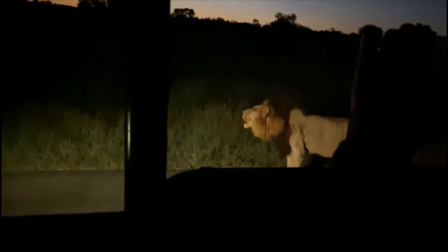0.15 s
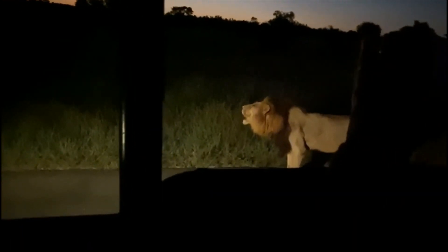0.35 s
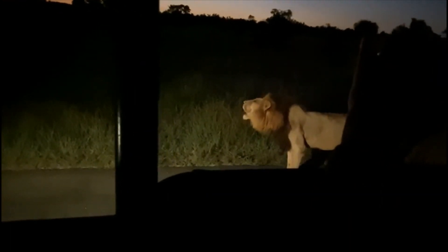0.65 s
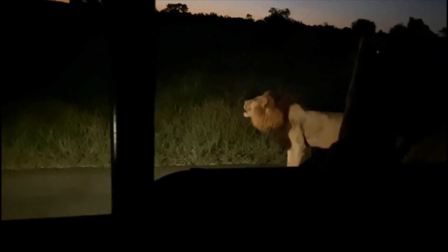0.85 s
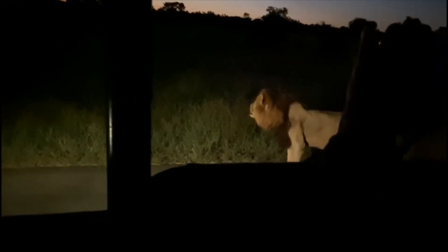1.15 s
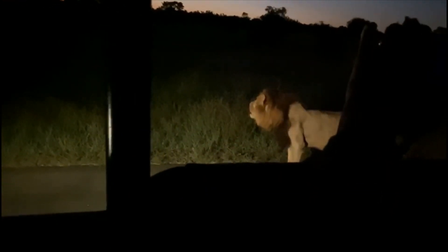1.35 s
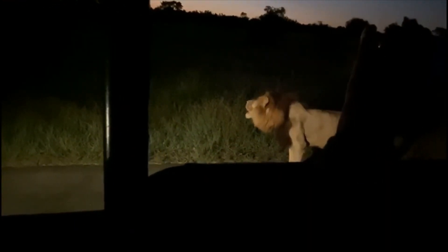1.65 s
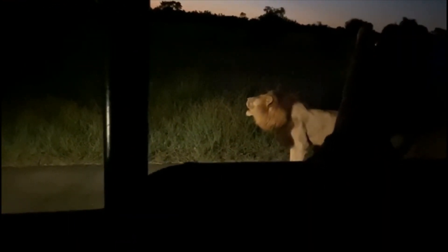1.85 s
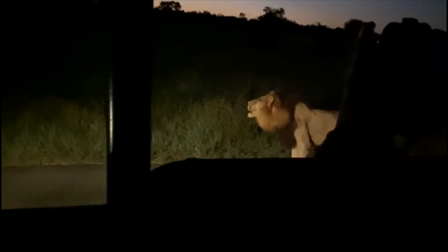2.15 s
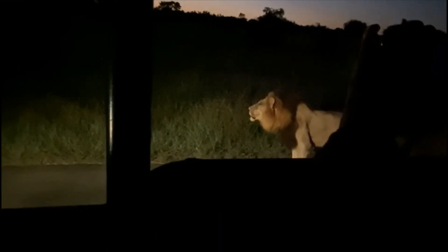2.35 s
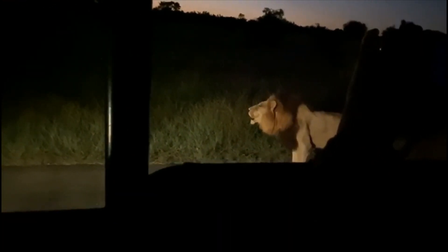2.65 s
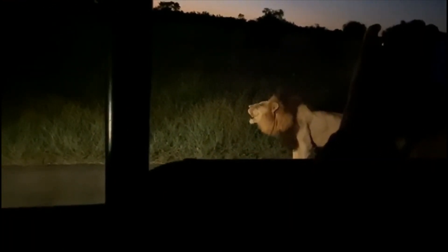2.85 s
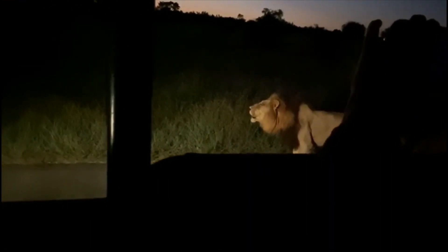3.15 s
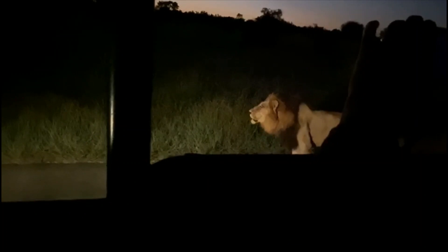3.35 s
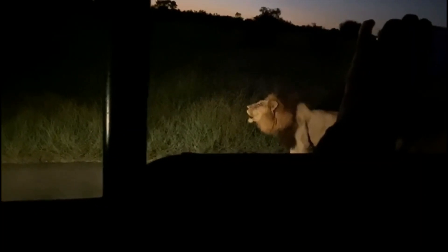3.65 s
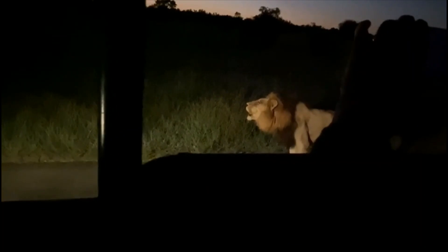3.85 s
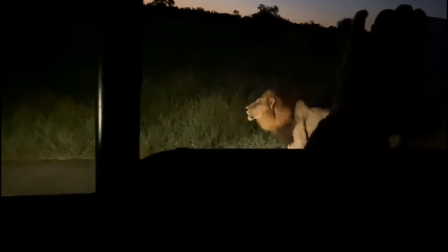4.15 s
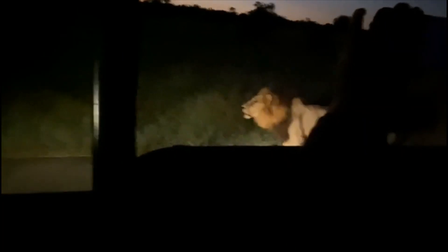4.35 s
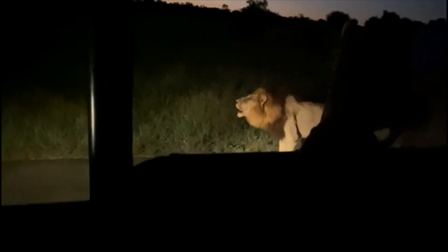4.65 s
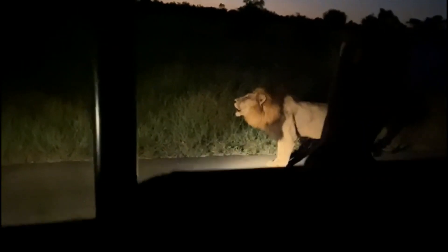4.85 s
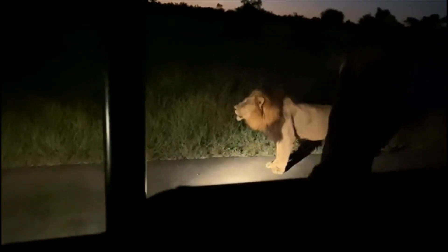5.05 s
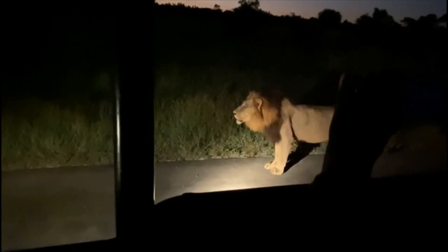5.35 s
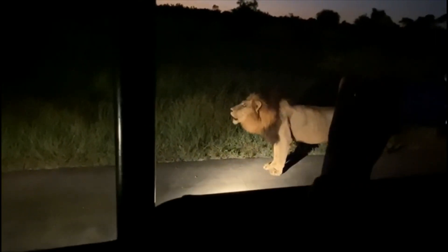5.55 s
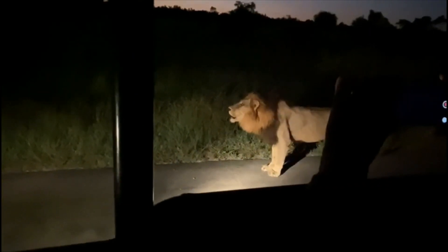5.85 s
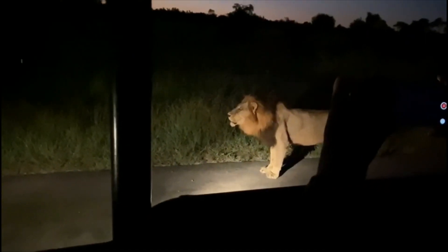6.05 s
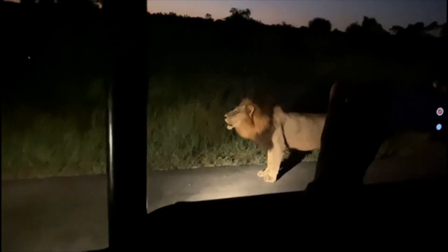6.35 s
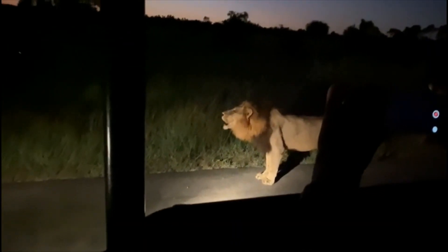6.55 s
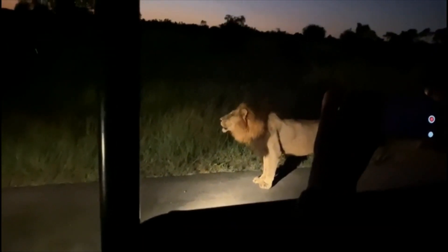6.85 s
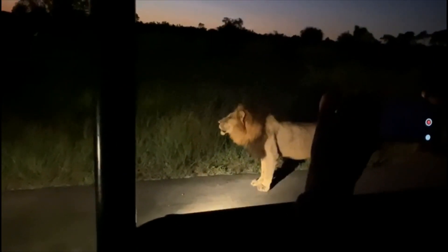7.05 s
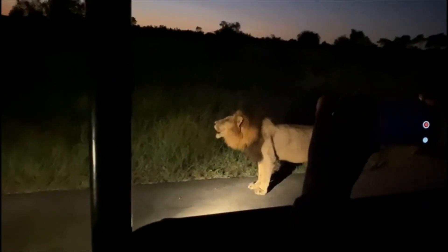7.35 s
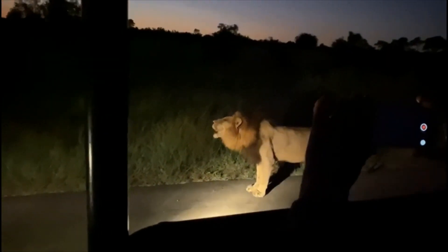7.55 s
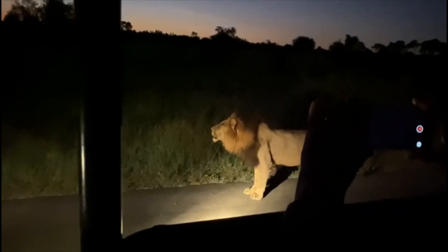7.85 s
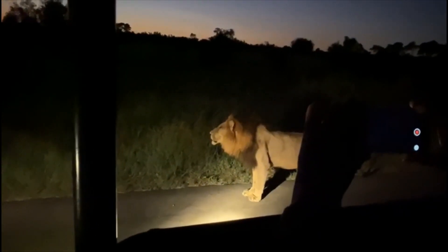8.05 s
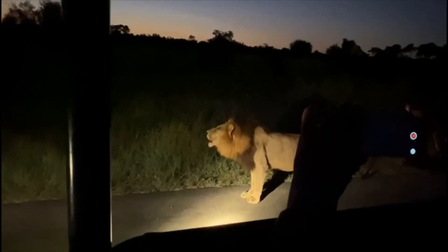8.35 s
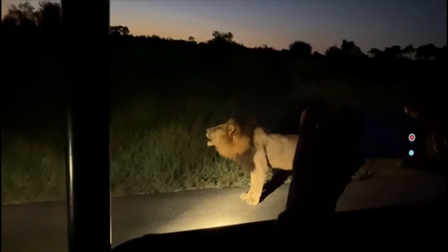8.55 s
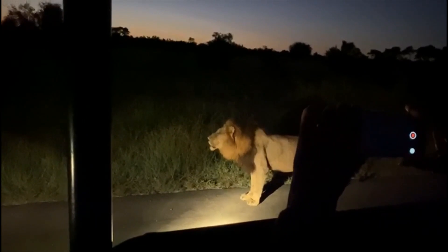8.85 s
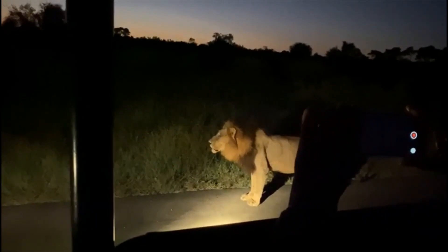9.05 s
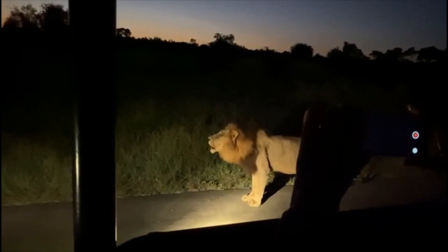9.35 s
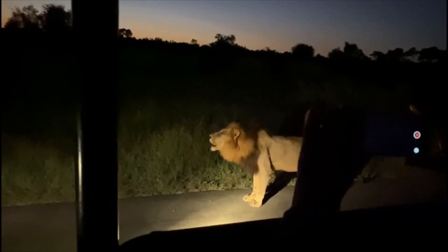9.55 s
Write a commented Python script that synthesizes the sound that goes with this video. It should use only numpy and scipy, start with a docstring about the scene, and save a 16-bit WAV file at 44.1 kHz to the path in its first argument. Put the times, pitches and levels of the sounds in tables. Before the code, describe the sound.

A lion very close by gives two deep moaning roars, then eight short hoarse grunts with rasping breaths between, over faint night crickets.

```python
"""In an open vehicle on the plain at dusk, a lion is heard a few metres away: two roars, then eight grunts.
Each call sums a near-sine chest tone, throat resonances driven by pulses and puffs, hiss and a slow growl.
A rasping breath, shaped noise, precedes each call; cloth rustles, bumps and gliding bird whistles are added.
The cabin rings low through sparse decaying echoes; crickets (chirping noise) and night air lie behind."""
import sys
import numpy as np
from scipy import signal
from scipy.fft import rfft, irfft, next_fast_len
from scipy.io import wavfile
from scipy.ndimage import uniform_filter1d, minimum_filter1d

SR = 44100
rng = np.random.default_rng(int(sys.argv[2]) if len(sys.argv) > 2 else 0)


def transcribe(u):
    """Save the signal u as a 16-bit wav file named by the first command-line argument.

    u: samples, shape (n,) or (channels, n), limited to [-1, 1]; the rate is SR.
    q: integer samples, one column per channel.
    """
    v = np.clip(np.atleast_2d(u).T, -1, 1)
    q = np.round(v * 32767).astype(np.int16)
    wavfile.write(sys.argv[1], SR, q)


N = 428211

# calls: [start t/s, fraying after t/s, break after t/s, top pitch f/Hz, pitch at break f/Hz,
#         held roughness 0-1, chest level/dB, throat level/dB, hiss level/dB, growl level/dB]
CALLS = [(.26, .44, 0.58, 171.8, 134.8, .38, -6, -17, -46.5, -23.5),
         (1.64, .25, 0.41, 151.2, 122.5, .45, -5.5, -15.5, -46.5, -24),
         (2.81, .18, 0.24, 145.9, 122.2, 0.54, -4.5, -14, -40, -25.5),
         (3.71, .15, 0.2, 146.5, 122.4, .55, -6, -15.5, -40, -27.5),
         (4.65, .18, 0.23, 141.5, 118.9, .5, -5, -14.5, -38.5, -28),
         (5.62, .14, 0.19, 138.6, 130.3, 0.66, -6.5, -13, -34, -25),
         (6.485, 0.12, 0.16, 131, 120.9, 0.7, -6, -13, -34.5, -29),
         (7.43, .15, 0.21, 137, 123.2, .6, -6, -13.5, -37.5, -24.5),
         (8.415, .14, 0.19, 133.8, 122, 0.7, -6.5, -14, -39, -25.5),
         (9.395, .15, 0.19, 132.9, 120.2, 0.7, -6.5, -15, -37, -24)]
# resonances of throat and of mouth: [f/Hz, greatest width/Hz, level/dB]
THROAT_MODES = [(217, 98, -2), (368.5, 28.8, -2), (442.8, 34, -3), (513, 27, -6.5), (600.5, 28, -2),
                (670, 28, -8.5), (764.6, 18, -6.5), (908, 20, -12), (1089, 26, -8), (1166, 45, -8.5),
                (1370, 76, -17), (1549, 80, -25)]
MOUTH_MODES = [(1970, 75, 6.5), (2360, 140, 7.5), (2860, 370, -0.5), (3670, 170, 1), (4320, 480, -3.5),
               (5160, 410, -1), (6090, 880, -6.5), (6850, 760, -5.5), (9750, 890, -9), (10630, 1300, -18.5)]
# envelope of each layer: [level at start/dB re full, opening t/s, sag up to the break/dB, slope after it/(dB/s)]
CHEST_EFFORT = (-43, 0.16, -0.5, -320)
THROAT_EFFORT = (-47, 0.12, -6.5, -230)
HISS_EFFORT = (-38, 0.177, -3.5, -190)
# pitch contour of a call
ONSET_HZ, CLIMB_FROM_S, CLIMB_S, SAG_CURVE, TAIL_S = 108.17, .04, .13, 1.6, .45
# the chest tone drops a step at the break and lingers
BREAK_DB, BREAK_S, LINGER_S = -13.5, .04, 0.079
# the growl swells while the voice frays
GROWL_UNDER_DB, GROWL_LINGER_S, GROWL_FALL_DB_PER_S = -17.5, 0.074, -240
# roughness 0-1 sets the share of noise in the throat
ROUGH_ONSET, ROUGH_FRAYED, SETTLE_S, FRAY_S = .5, .9, .16, .08

# indrawn breaths and one low after-growl: [start t/s, peak t/s, end t/s, rasp level/dB, rumble level/dB]
BREATH_EVENTS = [(0, .13, .27, -48.5, -41), (1.358, 1.54, 1.65, -48.5, -37.5), (2.58, 2.72, 2.82, -52, -44),
                 (3.081, 3.27, 3.72, -62.5, -30.5), (3.53, 3.62, 3.72, -56.5, -55),
                 (4.441, 4.57, 4.66, -53.5, -50), (5.45, 5.58, 5.64, -54.5, -56),
                 (6.319, 6.42, 6.5, -59, -57), (7.15, 7.3, 7.44, -55, -52),
                 (8.24, 8.33, 8.42, -59.5, -59.5), (9.22, 9.32, 9.4, -57.5, -57)]
# resonances of the tract on inhaling: [f/Hz, greatest width/Hz, level/dB]
INHALE_MODES = [(238, 360, -8.5), (458, 240, -2.5), (588, 140, -8.5), (763, 27, -3), (1160, 250, -8.5),
                (1390, 83, -12), (2076, 900, -25.5)]
BREATH_IN_DB, BREATH_OUT_DB = -17, -11.5  # at start and end, re the peak

# rustles of cloth: [start t/s, peak t/s, end t/s, level between 2.2 and 4 kHz/dB]
RUSTLE_EVENTS = [(0.858, .92, 1.12, -61.5), (1.001, 1.22, 1.4, -66), (1.112, 1.133, 1.19, -62),
                 (1.308, 1.342, 1.4, -58), (1.962, 2.009, 2.16, -55.5), (4.07, 4.117, 4.16, -65.5),
                 (4.14, 4.206, 4.32, -59), (5.518, 5.57, 5.62, -66.5)]
# colour of cloth: [f/Hz, spectral level/dB]
CLOTH_SPECTRUM = [(88, -30), (150, -11), (533, -16), (628, -21.5), (1130, -17), (2150, -21.5), (3870, -23),
                  (7220, -31), (8520, -42.5), (10600, -32.5), (12100, -36), (15700, -76.5), (22000, -120)]
RUSTLE_IN_DB, RUSTLE_OUT_DB = -10.5, -13.5  # at start and end, re the peak

# bumps on the vehicle: [start t/s, level before halving/dB, f/Hz, decay by 60 dB t/s]
BUMPS = [(1.017, -32, 148, 0.13), (1.14, -34, 804, 0.22), (1.219, -39.5, 711, 0.17),
         (3.437, -37.5, 166.2, 0.12), (6.118, -38, 487, 0.22), (9.079, -50, 139.7, 0.1)]
# far bird whistles: [start t/s, length t/s, first f/Hz, middle f/Hz, last f/Hz, level/dB]
BIRD_WHISTLES = [(3.27, 0.098, 3600, 3670, 3660, -76), (3.457, 0.065, 3300, 3250, 3245, -74),
                 (3.55, .09, 3230, 3300, 3250, -75), (3.66, 0.067, 2900, 3000, 2980, -71),
                 (6.98, .09, 3270, 3210, 3220, -74), (7.147, 0.084, 3080, 2800, 3130, -67),
                 (7.906, 0.18, 5370, 5780, 5420, -82), (8.039, 0.082, 2550, 2750, 3000, -79.5)]

# nearer crickets: [f/Hz, chirp rate/(1/s), chirp length t/s, level/dB re chorus before gating]
CRICKET_SINGERS = [(4670, 4.6, 0.052, 5), (5100, 1.1, 0.084, 5.5), (4440, 1.8, 0.17, -2)]
CHIRP_HZ, CHIRP_WIDTH_HZ, STROKES_PER_S = 4710, 450, 50
# the recorder's automatic gain turns the crickets down after each call, then lets them back up
CRICKET_DB, DUCK_DB, DUCK_S, RECOVER_S = -64, -6, 0.36, 0.37

# colour of the night air: [f/Hz, relative spectral level/dB]
NIGHT_SPECTRUM = [(15, -70), (25, -40), (48, -10), (101, -14.5), (134, -1), (237, -23), (349, -30),
                  (1440, -41.5), (1730, -41), (2020, -44), (4990, -45.5), (8580, -66), (12000, -56),
                  (15600, -87.5), (22000, -120)]
NIGHT_DB = -59.5

# reverberation of the cabin: [f/Hz, decay by 60 dB t/s]
CABIN_DECAY = [(60, 1), (140, 0.43), (300, 0.067), (1000, .18), (3000, 0.059), (8000, 0.034)]
# relative strength of its echoes: [f/Hz, level/dB]
ECHO_STRENGTH = [(60, -9), (140, -7), (500, -4), (1200, 0.5), (2500, 13), (6000, 2), (11000, -1.5)]
# phase by which the left port leads the right: [f/Hz, phase/rad]
PORT_LEAD = [(0, .04), (220, .05), (400, .4), (700, .3), (1030, .6), (1380, -.7), (2330, 1.5), (2840, 1.2),
             (4480, .8), (5250, 1.2), (5600, 0), (7490, 0), (8400, 3.0), (9400, 2.4), (9820, .7)]
# balance of the ports, faded in from 300 to 600 Hz: [f/Hz, left minus right level/dB]
PORT_BALANCE = [(60, 1), (140, -6), (350, 0.5), (840, -3), (2010, -2.5), (4830, 5.5), (11600, 1)]
EDGE_HZ, CEILING_DB = 12170, -4  # band limit and onset of limiting


def gain_of(db):
    """dB to gain."""
    return 10 ** (np.asarray(db) / 20)


def evened(x):
    """Scales to rms 1."""
    return x / np.sqrt(np.mean(x ** 2) + 1e-20)


def read(points, hz):
    """A spectrum's value, straight on a log-frequency axis."""
    f, value = np.transpose(points)
    return np.interp(np.log(hz + 1), np.log(f + 1), value)


def add(mix, s, sound):
    """Mixes a sound in at s seconds."""
    part = mix[max(round(s * SR), 0):][:len(sound)]
    part += sound[:len(part)]


def filtered(x, response):
    """Multiplies the spectrum by response(hz)."""
    size = next_fast_len(x.shape[-1] + 8192)
    return irfft(rfft(x, size) * response(np.fft.rfftfreq(size, 1 / SR)), size)[..., :x.shape[-1]]


def rung(x, modes):
    """Passes x through steep parallel resonances, rms 1."""
    return evened(filtered(x, lambda hz: sum(gain_of(db) * (-1) ** k / (1 + 1j * (hz - f) / abs(w)) ** 2
                                             for k, (f, w, db) in enumerate(modes))))


def drift(count, per_s):
    """Smooth chance of rms 1 that changes about per_s times a second."""
    size = int(SR / per_s)
    return evened(uniform_filter1d(uniform_filter1d(rng.standard_normal(count), size), size))


def call(start, frays, breaks, top_hz, break_hz, held, chest_db, throat_db, hiss_db, growl_db):
    """Source and filter: the folds give a near-sine and pulsed air, which the tract's resonances colour."""
    t = np.arange(0, breaks + TAIL_S, 1 / SR)
    count = len(t)

    topped = CLIMB_FROM_S + CLIMB_S
    climb = np.clip((t - CLIMB_FROM_S) / CLIMB_S, 0, 1)
    sag = np.clip((t - topped) / max(breaks - topped, BREAK_S), 0, 1)
    hz = ONSET_HZ + (top_hz - ONSET_HZ) * np.sin(np.pi / 2 * climb)
    hz = hz - (top_hz - break_hz) * sag ** SAG_CURVE

    settling = np.interp(t, [0, SETTLE_S], [ROUGH_ONSET, held])
    fraying = np.interp(t, [frays, frays + FRAY_S], [0, ROUGH_FRAYED])
    rough = np.maximum(settling, fraying)

    chest_db = chest_db + effort(t, breaks, *CHEST_EFFORT, LINGER_S)
    chest_db = chest_db + BREAK_DB * np.clip((t - breaks) / BREAK_S + .5, 0, 1)
    throat_db = throat_db + effort(t, breaks, *THROAT_EFFORT)
    hiss_db = hiss_db + effort(t, breaks, *HISS_EFFORT)
    growl_db = growl_db + GROWL_UNDER_DB * np.clip((breaks - t) / max(breaks - frays, BREAK_S), 0, 1)
    growl_db = growl_db + GROWL_FALL_DB_PER_S * np.maximum(t - breaks - GROWL_LINGER_S, 0)

    # roughness unsteadies the pitch; turns counts cycles of the folds
    jitter = (.04 * rough ** 2 + .18 * rough ** 12) * drift(count, 90)
    turns = np.cumsum(hz * (1 + jitter)) / SR
    chest = np.sqrt(2) * np.sin(2 * np.pi * turns) * gain_of(6 * rough ** 6 * drift(count, 60))

    pulses = 0.23 * np.cos(4 * np.pi * turns)
    for k in range(3, 12):
        pulses += np.cos(2 * np.pi * k * turns) * np.exp(-(k / 6) ** 2)
    # strong and weak cycles alternate at times
    pulses = pulses * (1 + .6 * rough * drift(count, 25) * np.cos(np.pi * turns))
    # air escapes once a cycle
    puffs = (.5 + np.exp(-(turns % 1) / 0.9)) * rng.standard_normal((2, count))

    clear = steadied(rung(pulses, THROAT_MODES))
    rasp = steadied(wavering(puffs[0], THROAT_MODES, 3.3))
    rasp = rasp * gain_of((1.5 + 5 * rough ** 6) * drift(count, 70))
    throat = np.sqrt(1 - rough ** 2) * clear + rough * rasp
    hiss = wavering(puffs[1], MOUTH_MODES, 2.9) * gain_of(3 * rough * drift(count, 40))
    growl = steadied(rung(rng.standard_normal(count), [(72.0, 32, 0)]))

    voice = gain_of(chest_db) * chest + gain_of(throat_db) * throat
    voice = voice + gain_of(hiss_db) * hiss + gain_of(growl_db) * growl
    return start, voice * signal.windows.tukey(count, .03)


def effort(t, breaks, start_db, open_s, sag_db, fall_db_per_s, linger_s=0):
    """Exponential decay is linear in dB: a rounded opening, a sag to the break, then a steady fall."""
    opening = start_db * np.maximum(1 - t / open_s, 0) ** 2
    sag = sag_db * np.minimum(t / breaks, 1) ** 2
    return opening + sag + fall_db_per_s * np.maximum(t - breaks - linger_s, 0)


def wavering(x, modes, waver_db):
    """Time-varying resonance: each mode swells and fades by itself as the tract changes shape."""
    total = np.zeros(len(x))
    for f, width, db in modes:
        width = min(width, 15 + .04 * f + 1.2e-5 * f ** 2)
        level = gain_of(db + waver_db * drift(len(x), 18))
        total += level * np.sqrt(width) * rung(x, [(f, width, 0)])
    return evened(total)


def steadied(x):
    """Level normalisation: dividing by the short-time rms holds the slow loudness near 1."""
    return x / np.sqrt(uniform_filter1d(x ** 2, 3000) + 1e-3)


def breath(start, peak, end, rasp_db, rumble_db):
    """Turbulent flow: air drawn over slack folds flutters irregularly and excites the tract."""
    t, shape_db = swell(start, peak, end, BREATH_IN_DB, BREATH_OUT_DB)
    air = rng.standard_normal((2, len(t))) * gain_of(1.5 * drift(len(t), 80))
    rasp = gain_of(rasp_db) * wavering(air[0], INHALE_MODES, 7.3)
    # the rumble takes the shape twice, so it is more peaked than the rasp
    rumble = gain_of(rumble_db + shape_db) * rung(air[1], [(70, 9.9, 3.5), (159.0, 60, -8)])
    return t[0], (rasp + rumble) * gain_of(shape_db) * signal.windows.tukey(len(t), .15)


def swell(start, peak, end, in_db, out_db):
    """Amplitude envelope: times of an event and its rounded rise and fall, parabolic in dB."""
    t = np.arange(max(start, 0), end, 1 / SR)
    rise = in_db * ((peak - t) / (peak - start)) ** 2
    fall = out_db * ((t - peak) / (end - peak)) ** 2
    return t, np.where(t < peak, rise, fall)


def rustle(start, peak, end, level_db):
    """Stick-slip friction: clumped fibre slips make noise that the cloth colours."""
    t, shape_db = swell(start, peak, end, RUSTLE_IN_DB, RUSTLE_OUT_DB)
    slips = rng.standard_normal(len(t)) * gain_of(2 * drift(len(t), 150))
    sound = filtered(slips, lambda hz: gain_of(read(CLOTH_SPECTRUM, hz)))
    middle = filtered(sound, lambda hz: (hz > 2200) & (hz < 4000))  # band that sets the level
    return t[0], gain_of(level_db + shape_db) * sound / middle.std() * signal.windows.tukey(len(t), .2)


def knock(start, level_db, hz, t60):
    """Damped resonance: a soft bump on the vehicle is a dull puff that rings briefly."""
    t = np.arange(6000) / SR
    ring = rung(rng.standard_normal(6000), [(135, 60, 0), (hz, 120, 0), (350, 300, -8)])
    return start, gain_of(level_db - 60 * t / t60) * ring / 2 * np.minimum(t / .003, 1)


def whistle(start, length, first_hz, middle_hz, last_hz, level_db):
    """Frequency modulation: a thin sine of wavering level glides along a parabola through three pitches."""
    u = np.arange(0, length, 1 / SR) / length
    hz = first_hz * (1 - u) * (1 - 2 * u) + middle_hz * 4 * u * (1 - u) + last_hz * u * (2 * u - 1)
    level = gain_of(level_db + 4 * drift(len(u), 60))
    tone = np.sqrt(2) * np.sin(2 * np.pi * np.cumsum(hz) / SR)
    return start, level * tone * signal.windows.tukey(len(u), .6)


def ports(x):
    """Interchannel phase and level: two microphone ports hear one source, with the bass nearly alike."""
    side = np.array([[.5], [-.5]])  # left, right

    def response(hz):
        tilt_db = read(PORT_BALANCE, hz) * np.clip(hz / 300 - 1, 0, 1)
        lead = np.interp(hz, *np.transpose(PORT_LEAD))
        return gain_of(side * tilt_db) * np.exp(1j * side * lead)
    return filtered(x, response)


def cabin(x):
    """Reverberation: sparse echoes of random sign, each band decaying at its own rate."""
    taps = np.zeros((3, SR))
    at = np.arange(100, SR - 20, 20) + rng.integers(0, 20, (3, (SR - 101) // 20))
    np.put_along_axis(taps, at, rng.choice([-1., 1.], at.shape), 1)
    hz, t, bands = signal.stft(taps, SR, nperseg=1024)
    # alike at both ears up to 200 Hz, independent from 700 Hz
    apart = np.clip(hz / 500 - .4, 0, 1)[:, None]
    bands = np.sqrt(1 - apart ** 2) * bands[0] + apart * bands[1:]
    bands = bands * gain_of(-60 * t / read(CABIN_DECAY, hz)[:, None])
    bands = bands * gain_of(read(ECHO_STRENGTH, hz))[:, None]
    tail = signal.istft(bands, SR, nperseg=1024)[1]
    return signal.fftconvolve(x[None], tail / 30, axes=1)[:, :N]


def crickets():
    """Amplitude modulation: a fuzzy chorus, and nearer singers whose chirps are trains of wing strokes."""
    t = np.arange(N) / SR
    near, far = rung(rng.standard_normal((2, N)), [(CHIRP_HZ, CHIRP_WIDTH_HZ, 0)])
    strokes = np.maximum(np.sin(2 * np.pi * STROKES_PER_S * t), 0)
    for hz, per_s, length, db in CRICKET_SINGERS:
        gate = (t * per_s + rng.random()) % 1 < length * per_s
        singing = uniform_filter1d(1. * gate, 900)
        near = near + gain_of(db) * singing * strokes * rung(rng.standard_normal(N), [(hz, 90, 0)])
    return gain_of(ducked_db(t)) * np.array([near + .6 * far, 0.47 * near - 0.57 * far])


def ducked_db(t):
    """Automatic gain: the recorder turns the crickets down after each call, then lets them back up."""
    break_times = np.array([start + breaks for start, frays, breaks, *rest in CALLS])
    since = t - break_times[:, None]
    duck = (since > 0) * np.clip(1 - (since - DUCK_S) / RECOVER_S, 0, 1)
    return CRICKET_DB + DUCK_DB * duck.max(0)


def night():
    """Coloured noise: the low hush of the night air wavers unevenly, several times a second."""
    air = rng.standard_normal((3, N))
    colour = lambda hz: gain_of(read(NIGHT_SPECTRUM, hz))
    # the part that differs between the ears fades in above 150 Hz
    wide = lambda hz: colour(hz) * np.clip(hz / 1500 - .1, 0, 1)
    hush = filtered(air[0], colour) + filtered(air[1:], wide)
    return gain_of(NIGHT_DB + 4.5 * drift(N, 5.5)) * evened(hush)


def scene():
    """Superposition: lion, cloth, bumps and bird, direct and through the cabin, over crickets and night air."""
    near = np.zeros(N)
    sources = [(call, CALLS), (breath, BREATH_EVENTS), (rustle, RUSTLE_EVENTS),
               (whistle, BIRD_WHISTLES), (knock, BUMPS)]
    for make, table in sources:
        for row in table:
            add(near, *make(*row))
    return ports(near) + cabin(near) + crickets() + night()


def record(dry):
    """Gain reduction and low-pass filtering: a limiter holds down the loudest peaks, then the band ends."""
    peak_db = 20 * np.log10(-minimum_filter1d(-abs(dry).max(0), 600) + 1e-9)
    over_db = uniform_filter1d(np.maximum(peak_db - CEILING_DB, 0), 500)
    held = dry / gain_of(.8 * over_db)
    low_pass = signal.firwin(1023, EDGE_HZ, window=("kaiser", 9), fs=SR)
    return signal.oaconvolve(held, low_pass[None], "same")


dry = scene()
out = record(dry)
transcribe(out)
```